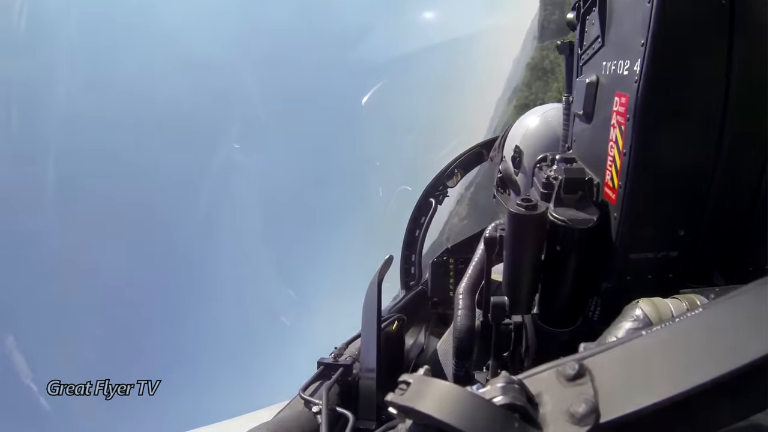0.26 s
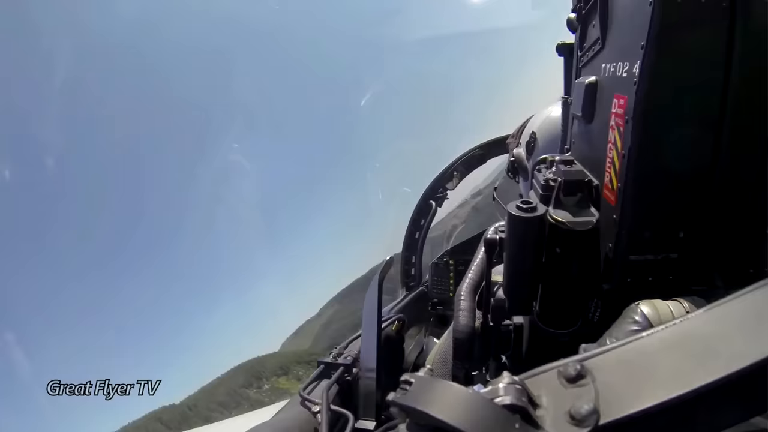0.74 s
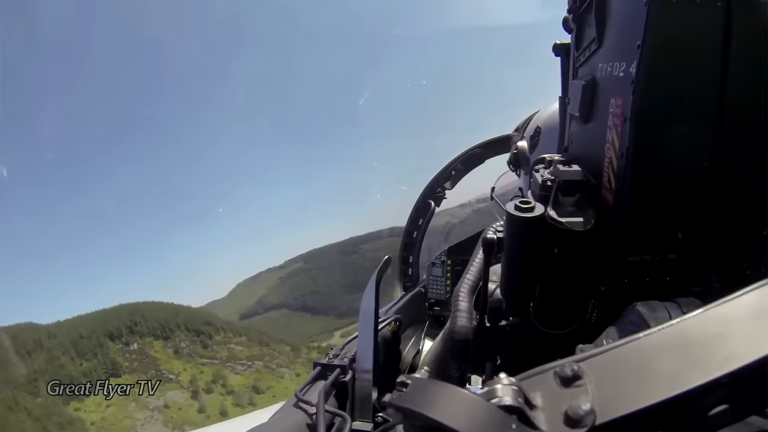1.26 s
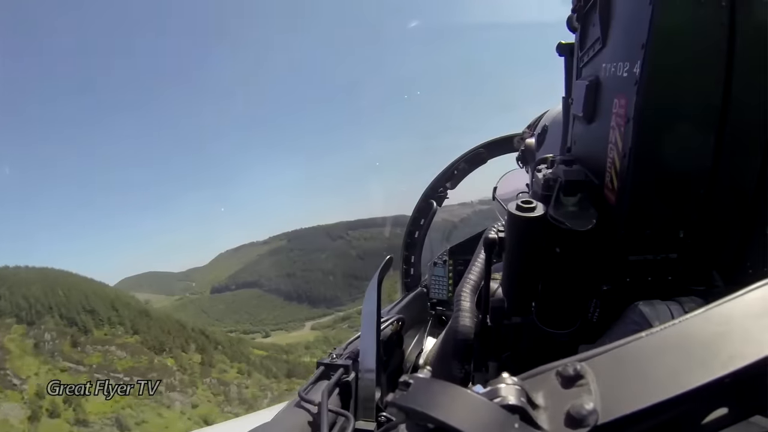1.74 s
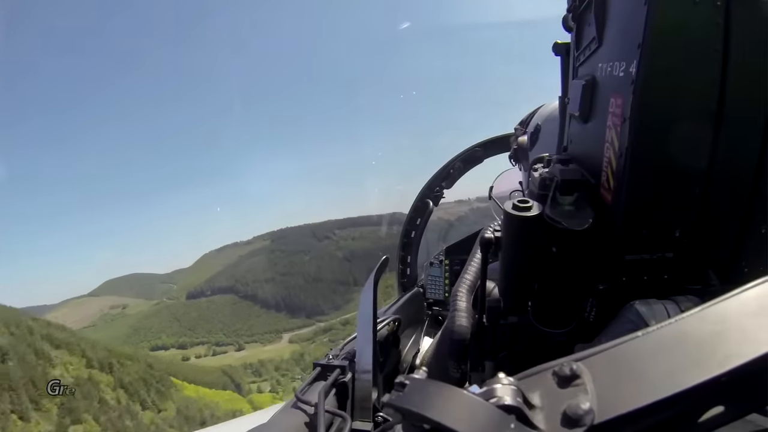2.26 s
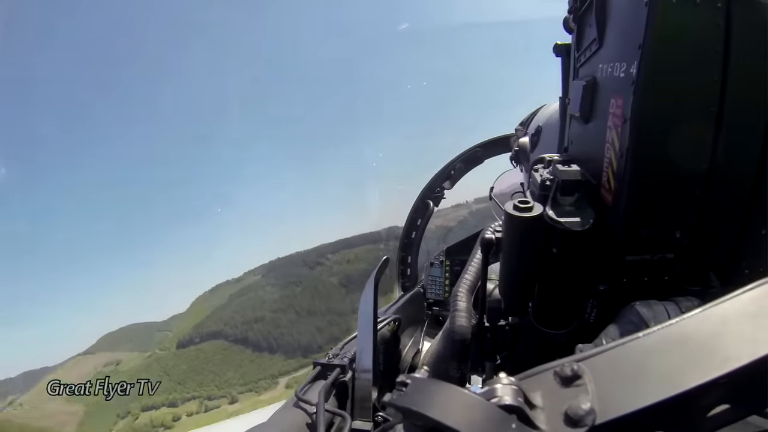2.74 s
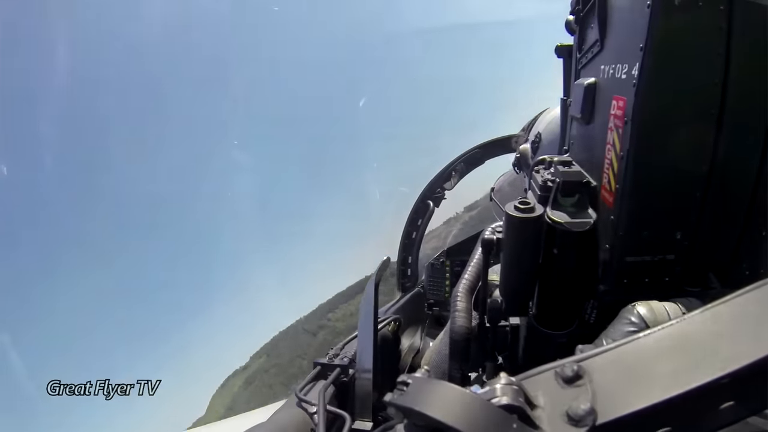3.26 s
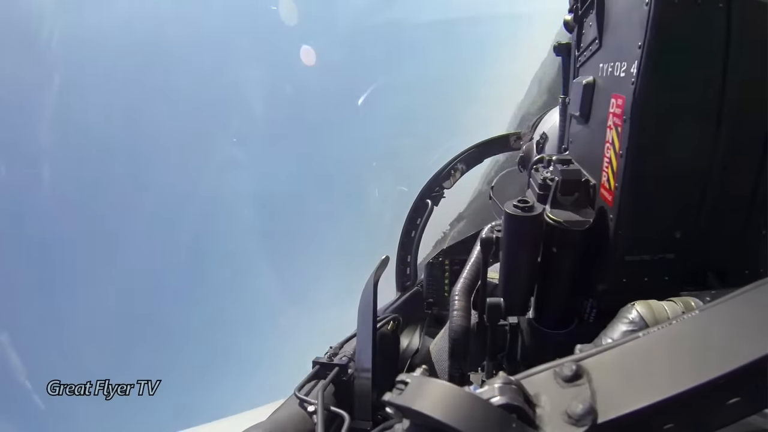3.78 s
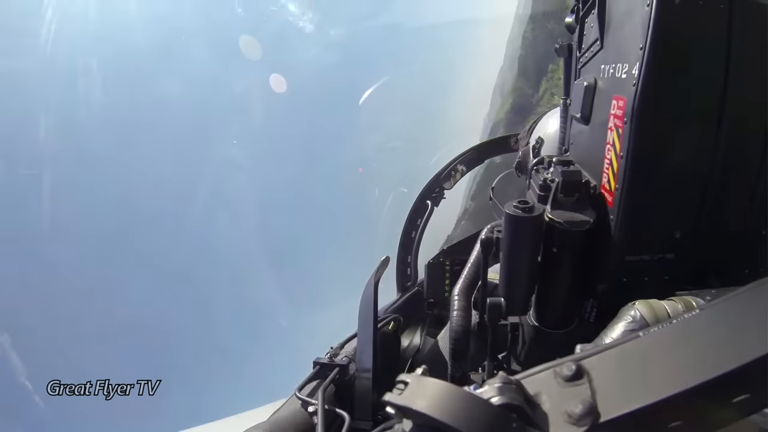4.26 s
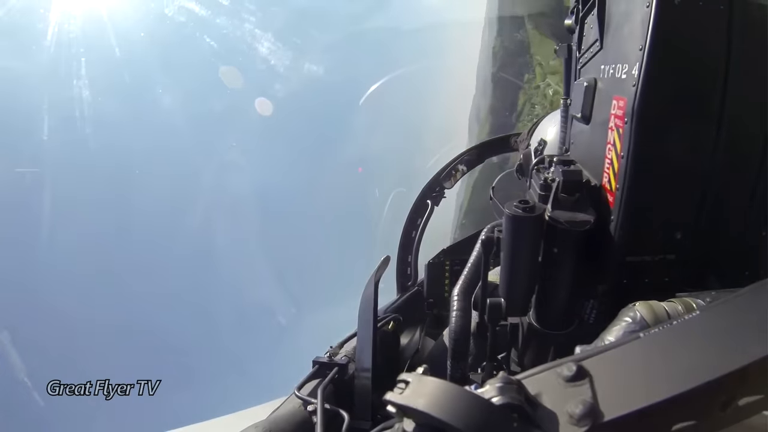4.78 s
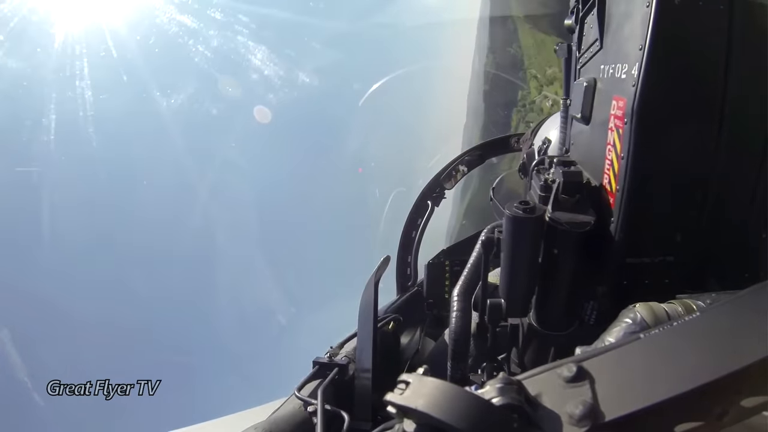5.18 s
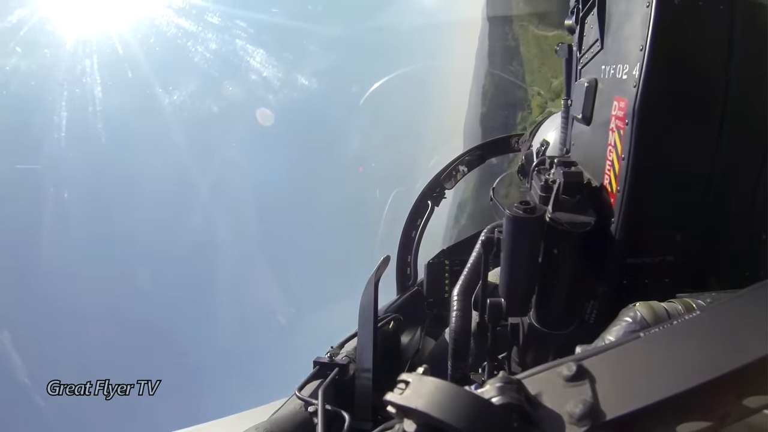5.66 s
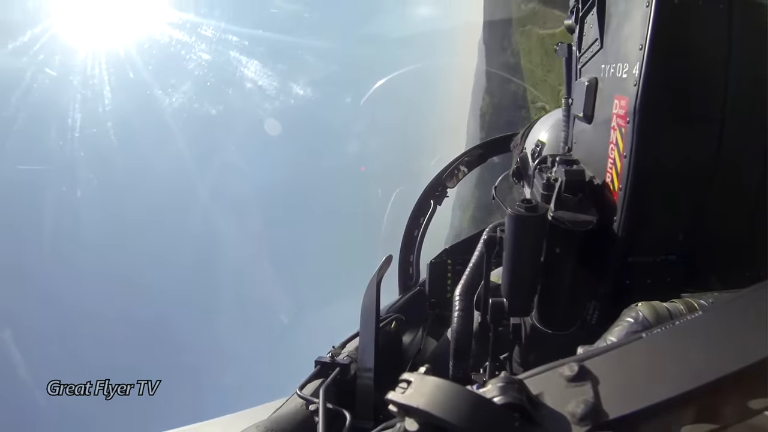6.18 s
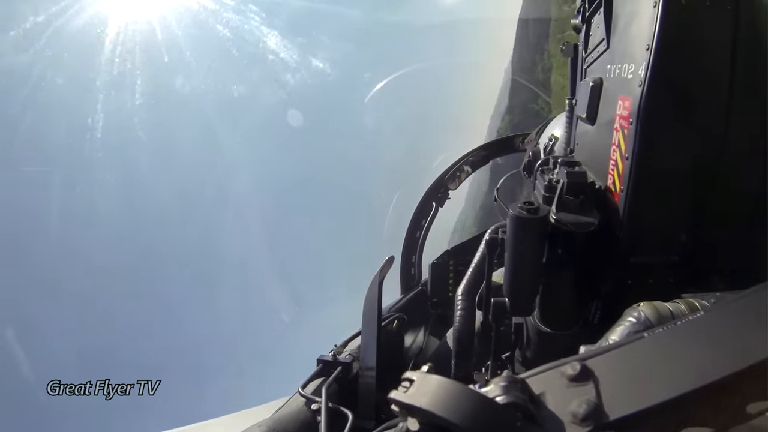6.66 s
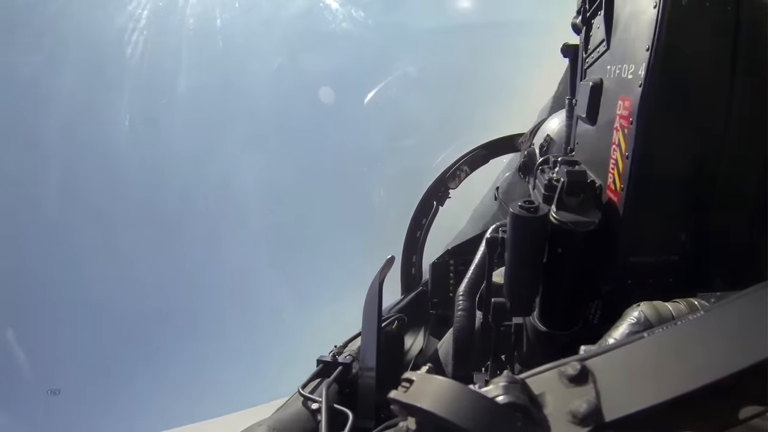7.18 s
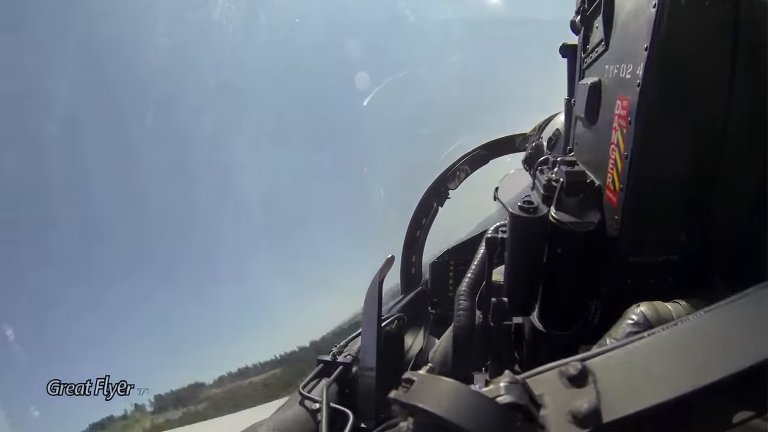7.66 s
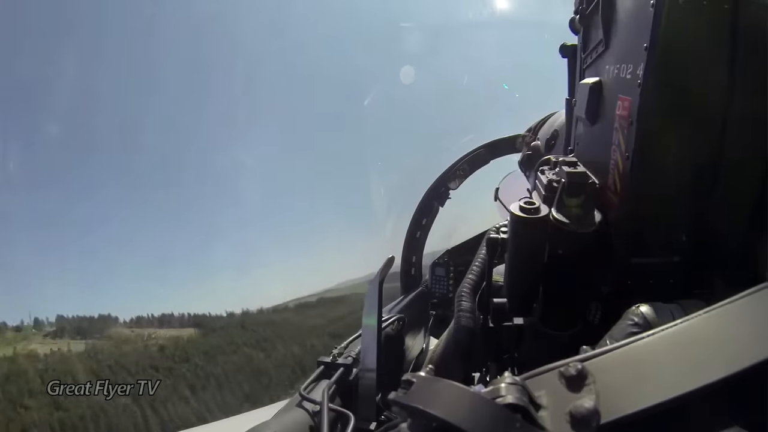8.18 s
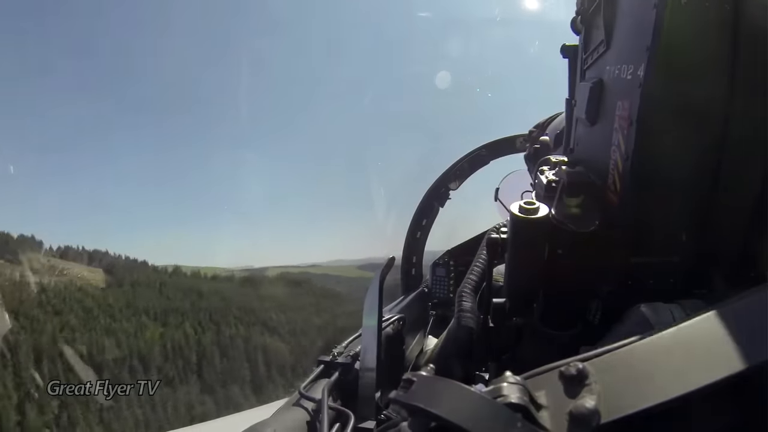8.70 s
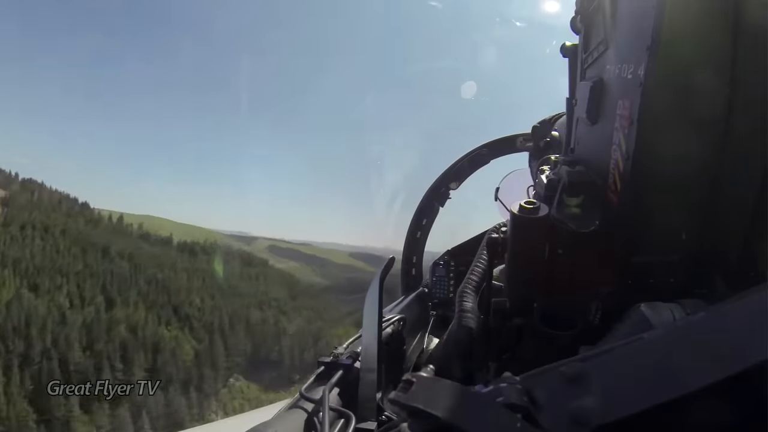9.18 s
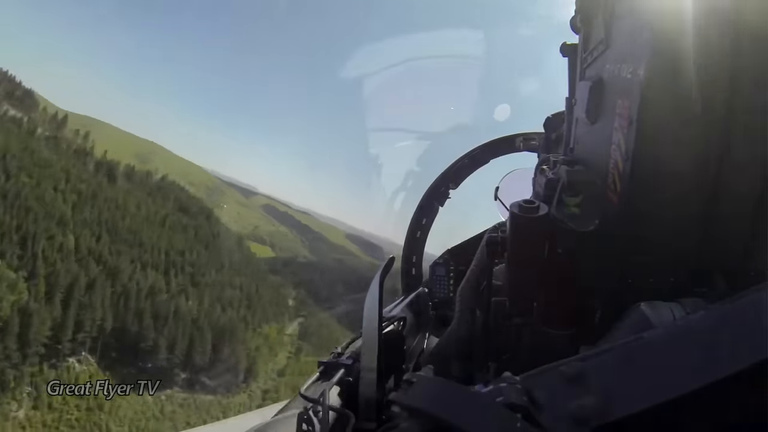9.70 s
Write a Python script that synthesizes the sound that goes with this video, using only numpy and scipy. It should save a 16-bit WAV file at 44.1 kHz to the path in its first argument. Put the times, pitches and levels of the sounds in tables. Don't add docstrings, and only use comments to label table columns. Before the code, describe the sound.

Loud low jet rumble and rushing wind in a closed cockpit, thudding mount knocks at first, then airy whistling that climbs in pitch.

```python
import sys
import numpy as np
from scipy import signal
from scipy.fft import rfft, irfft, next_fast_len
from scipy.io import wavfile
from scipy.ndimage import uniform_filter1d

SR = 44100
rng = np.random.default_rng(int(sys.argv[2]) if len(sys.argv) > 2 else 0)


def transcribe(u):
    v = np.clip(np.atleast_2d(u).T, -1, 1)
    q = np.round(v * 32767).astype(np.int16)
    wavfile.write(sys.argv[1], SR, q)


def invert_db(x):
    u = np.asarray(x, float) / 20
    return 10 ** u


N = 438354


def rms_one(x):
    return x / np.sqrt(np.mean(x ** 2) + 1e-20)


def in_time(rows):
    s, *columns = np.transpose(rows)
    return [np.interp(np.arange(N) / SR, s, c) for c in columns]


def drift(rate_hz):
    sos = signal.butter(2, rate_hz, fs=SR / 40, output="sos")
    slow = signal.sosfilt(sos, rng.standard_normal(N // 40 + 2002))[2000:]
    return np.interp(np.arange(N) / 40, np.arange(len(slow)), rms_one(slow))


def coloured(spectrum, flicker_db=0., even=0., more=()):
    # [centre_hz, width_hz, lift_db]
    resonance_modes = [(36, 61, 8.5), (61.3, 8.5, -6), (83, 24, -0.5), (144.2, 49, 2), (390, 63, 3),
                       (773, 70, -0.5), (1010, 14, -1), (1069.5, 20, 5), (1172, 75, 3.5), (1406, 50, 2.5),
                       (1580, 45, 4.5), (1829, 25, 4),
                       (2290, 300, 6.0), (2610, 120, 7.2), (2920, 90, 4.3), (3860, 120, 4.9),
                     (4320, 130, 4.7), (4980, 110, 5.6), (5130, 120, 4.5), (5690, 650, 9.0),
                     (6930, 1000, 10.9), (9070, 1140, 7.0), (11270, 1280, 12.0), (12690, 80, 5.5),
                     (13060, 250, 8.7), (13470, 560, 9.0)]
    size = next_fast_len(N)
    hz = np.maximum(np.fft.rfftfreq(size, 1 / SR), 1)
    points = np.array(spectrum)
    level_db = np.interp(np.log(hz), np.log(points[:, 0]), points[:, 1], left=-90, right=-90)
    for centre_hz, width_hz, lift_db in [*resonance_modes, *more]:
        level_db += lift_db / (1 + (2 * (hz - centre_hz) / width_hz) ** 2)
    white = rfft(rng.standard_normal(size))
    noise = rms_one(irfft(white * invert_db(level_db), size)[:N])
    swell = np.sqrt(uniform_filter1d(noise ** 2, 4000) + .02)
    evened = noise / swell ** np.clip(even, 0, 1)
    return rms_one(evened * invert_db(flicker_db * drift(35)))


def airframe():
    # [start_s, shudder_db, drone_db]
    airframe_levels = [(0, -11, -23), (.5, -18.5, -19.5), (1.0, -20, -25.5), (1.5, -17.5, -22.5),
                       (1.9, -15, -20.5), (2.3, -22.5, -22), (2.9, -21, -23.5), (3.5, -18.5, -16.5),
                       (4.0, -17, -22.5), (4.5, -16, -19), (5.2, -17, -17.5), (5.9, -16.5, -18),
                       (6.6, -15.5, -17), (7.5, -14.5, -20.5), (8.1, -17, -20), (8.7, -16.5, -20.5),
                       (9.3, -18.5, -16), (9.94, -17, -19)]
    # [pitch_hz, density_db_per_hz]
    shudder_spectrum = [(4.7, -36), (8.0, -33), (32, 1), (43, -3), (59, -9.5), (70, -19), (91, -55),
                        (150, -120)]
    # [pitch_hz, density_db_per_hz]
    drone_spectrum = [(34, -45), (58, -4.5), (65, -3), (124, 2), (142, -2.5), (185, -19.5), (240, -39.5),
                      (410, -120)]
    shudder_db, drone_db = in_time(airframe_levels)
    shudder = invert_db(shudder_db) * coloured(shudder_spectrum, even=0.68)
    drone = invert_db(drone_db) * coloured(drone_spectrum, even=0.15)
    return shudder + drone


def airflow():
    # [start_s, level_db]
    buffet_levels = [(0, 28), (.9, 22.5), (1.6, 23), (2.1, 20.5), (3.4, 21.5), (4.6, 21.5), (6.0, 23.5),
                     (6.8, 22), (7.3, 21.5), (8.2, 18.5), (9.0, 20), (9.94, 20.5)]
    # [pitch_hz, density_db_per_hz]
    buffet_spectrum = [(94, -16), (160, 1.5), (173, -2.5), (226, -7), (290, -12.5), (378, -9), (410, -8),
                       (443, -13), (540, -20), (700, -49.5), (1190, -120)]
    rush_spectrum = [(290, -41), (500, -7), (615, -5.5), (672, -6), (738, 0.5), (897, -5.5), (1050, 1),
                     (1280, -3), (1400, 0), (1510, -5.5), (1830, -7), (1980, -19.5), (2050, -38),
                     (2660, -49), (4510, -120)]
    hiss_spectrum = [(1750, -25.0), (1950, 0.0), (2430, -6.1), (3000, -3.1), (3500, -2.8), (4000, -8.7),
                     (4800, -14.3), (6200, -27.6), (8000, -29.3), (9500, -27.3), (10500, -36.0),
                     (12400, -42.0), (13800, -59.3), (15500, -53.8)]
    # [centre_hz, width_hz, lift_db]
    shifted_modes = [(3930, 160, -3.5), (4240, 160, -2.5), (5760, 260, -2), (7630, 500, 4),
                     (13600, 2200, -6)]
    buffet_db, = in_time(buffet_levels)
    moved = np.arange(N) / SR > 6.22
    hiss_after = invert_db(-.4) * coloured(hiss_spectrum, flicker_db=.5, more=shifted_modes)
    hiss_before = coloured(hiss_spectrum, flicker_db=.5)
    hiss = invert_db(8.5) * np.where(moved, hiss_after, hiss_before)
    rush = invert_db(22) * coloured(rush_spectrum, flicker_db=0.16)
    buffet = invert_db(buffet_db) * coloured(buffet_spectrum, flicker_db=2.5)
    return hiss + rush + buffet


def blades(wobble_hz=3.):
    # [start_s, main_hz, upper_hz, lower_hz]
    blade_pitches = [(0, 8705, 9122, 8392), (.45, 8715, 9116, 8392), (.75, 8770, 9114, 8395),
                     (1.6, 8807, 9117, 8398), (3.2, 8796, 9114, 8397), (3.7, 8769, 9118, 8397),
                     (4.7, 8762, 9114, 8393), (5.3, 8733, 9105, 8387), (6.2, 8720, 9098, 8383),
                     (6.7, 8694, 9090, 8382), (7.8, 8668, 9092, 8381), (9.94, 8658, 9108, 8387)]
    # [start_s, main_db, upper_db, lower_db]
    blade_levels = [(0, -24, -23, -40), (.8, -15, -26, -32), (2.0, -23, -17.5, -32), (3.6, -22, -22, -28),
                    (4.5, -21, -27, -29), (5.2, -20, -36, -38), (6.7, -21, -40, -34), (7.5, -27, -34, -33),
                    (8.2, -22, -26, -31), (9.3, -22, -31, -34), (9.94, -27, -16, -29)]
    out = np.zeros(N)
    for hz, level_db in zip(in_time(blade_pitches), in_time(blade_levels)):
        phase = 2 * np.pi * np.cumsum(hz + wobble_hz * drift(8)) / SR
        out += np.sqrt(2) * invert_db(level_db + 3.2 * drift(4.5)) * np.sin(phase)
    return out


def whistle(rows, flutter_hz=40., steady=0.):
    hz, level_db, wander_hz = in_time(rows)
    t = np.arange(N) / SR
    sounding = (t > rows[0][0]) & (t < rows[-1][0])
    phase = 2 * np.pi * np.cumsum(hz + wander_hz * drift(21)) / SR
    noisy = drift(flutter_hz) * np.sin(phase) + drift(flutter_hz) * np.cos(phase)
    tone = np.sqrt(2) * np.sin(phase)
    return sounding * invert_db(level_db + 1.66 * drift(5.2)) * (steady * tone + (1 - steady) * noisy)


def leaks():
    # [start_s, centre_hz, level_db, wander_hz]
    seal_track = [(5.9, 3270, -20, 25.1), (6.4, 3295, 3.5, 24.9), (7.5, 3240, 3, 24.9),
                  (8.3, 3230, 3.5, 23.8), (9.0, 3242, 1.5, 24.6), (9.94, 3256, 2, 25)]
    high_track = [(5.9, 4950, -29, 6), (6.6, 4960, -15, 6), (8.0, 4965, -13, 6), (9.5, 4970, -13, 6),
                  (9.94, 4970, -18, 6)]
    vent_track = [(4.6, 1823, -14, 10), (5.4, 1837, 5, 10), (6.2, 1810, 3, 10), (6.9, 1812, 8, 10),
                  (7.5, 1795, 10, 10), (8.0, 1790, -4, 10)]
    climb_track = [(8.2, 3190, -14, 5), (8.45, 3235, -2, 5), (8.8, 3255, 0, 5), (9.0, 3280, 4, 5),
                   (9.2, 3340, 7, 5), (9.5, 3432, 5, 5), (9.72, 3452, 4, 5), (9.8, 3480, 3, 5),
                   (9.94, 3490, -1, 5)]
    trail_track = [(9.0, 3170, -12, 4), (9.33, 3260, 4, 4), (9.5, 3310, -2, 4), (9.7, 3330, -10, 4),
                   (9.81, 3362, 8, 4), (9.94, 3390, -4, 4)]
    seal = whistle(seal_track, flutter_hz=150.) + whistle(high_track, flutter_hz=30.2)
    vent = whistle(vent_track, flutter_hz=10.0)
    climb = whistle(climb_track, flutter_hz=12., steady=.75)
    trail = whistle(trail_track, flutter_hz=12., steady=.6)
    return seal + vent + climb + trail


def ring(force, hz, t60):
    r, w = invert_db(-60 / (t60 * SR)), 2 * np.pi * hz / SR
    return signal.lfilter([0, np.sin(w)], [1, -2 * r * np.cos(w), r * r], force)


def push(contact_ms, lean=0.93, length=2048):
    phase = np.minimum(np.arange(length) / (contact_ms * SR / 1000), 1)
    return np.sin(np.pi * phase ** lean) ** 2


def swing(force, rebound_ms):
    return signal.lfilter(*signal.butter(1, 1000 / rebound_ms, "high", fs=SR), force)


def wall(force, damping=0.68):
    # [pitch_hz, level_db, t60_s]
    wall_modes = [(710, -38, 0.0067), (1168, -8.5, 0.037), (1730, -13, 0.018), (2320, -21, 0.03),
                  (2693, -12, 0.01), (3230, -11, 0.0079), (3600, -35, 0.0051), (4960, -20, 0.0052)]
    spread_db = 2.5 * rng.standard_normal(len(wall_modes))
    return sum(invert_db(db + own_db) * ring(force, hz, t60 / damping)
               for (hz, db, t60), own_db in zip(wall_modes, spread_db))


def rattle():
    decay_ms = 1.4
    touches = rng.standard_normal(2048) * (rng.random(2048) < .04)
    dying = touches * np.exp(-np.arange(2048) / (decay_ms * SR / 1000))
    force = np.convolve(dying, push(0.43, length=64))[:2048]
    return invert_db(-12.5) * wall(np.diff(force, prepend=0), damping=1.3)


def add(out, s, sound):
    i = round(s * SR)
    out[i:i + len(sound)] += sound[:N - i]


def bumps():
    # [start_s, peak_db, contact_ms, edge_db]
    bump_events = [(0.0572, -10, 3.7, -27), (0.1056, -4, 3.3, -19), (0.288, -7, 3.2, -16),
                   (0.375, -9.5, 3.5, -20), (0.426, -9, 2.9, -22), (0.473, -8.5, 3, -17.5),
                   (0.518, -10.5, 3.3, -18), (0.552, -8, 3.7, -27), (0.587, -16, 4.9, -25),
                   (0.719, -5.5, 3.5, -20.5), (0.778, -8, 3.1, -20), (0.81, -7.5, 3.3, -25),
                   (0.853, -12, 3.1, -18), (0.909, -9, 2.6, -19), (0.913, -11, 3.2, -24),
                   (1.591, -4, 3.1, -21.5), (1.784, -13, 2.3, -16), (1.859, -14.5, 4.9, -20),
                   (2.303, -11, 3.6, -24), (2.314, -16, 2.6, -18), (2.482, -26, 2.6, -23),
                   (2.571, -15, 4, -20), (3.125, -16, 3.9, -23), (3.468, -17.5, 1.9, -27),
                   (6.354, -13.5, 3.2, -27), (6.429, -19, 2.4, -26), (6.643, -22, 2.8, -16),
                   (7.81, -4.5, 3.3, -18)]
    out = np.zeros(N)
    for s, db, contact_ms, edge_db in bump_events:
        body = swing(push(0.92 * contact_ms, lean=0.73), rebound_ms=4.2)
        edge_force = np.roll(np.diff(push(0.41), prepend=0), round(.0007 * SR))
        edge = invert_db(edge_db) * (wall(edge_force, damping=1.5) + rattle())
        add(out, s + 0.0035, invert_db(db + 7.5) * (body + edge))
    return out


def taps():
    # [start_s, peak_db, contact_ms, ring_db, bounce_db]
    tap_events = [
        (1.104, -18.5, 1.75, -4, 6),
        (1.2969, -8.5, 0.97, -4, -4),
        (1.342, -23.5, 0.9, -12, 8),
        (2.161, -25, 1.7, -14, 2),
        (2.276, -7.5, 1.37, -8, 1.5),
        (2.368, -5, 1.02, -9, -6),
        (2.5966, -3, 0.72, -4.5, -10.5),
        (4.949, -20.5, 1.3, -17, 0),
        (6.212, -5, 0.83, -16, -7),
    ]
    hold_ms, stop_ms = 5.5, 2.5
    out = np.zeros(N)
    for s, db, contact_ms, ring_db, bounce_db in tap_events:
        force = push(contact_ms)
        bounce = invert_db(bounce_db) * np.roll(push(1.78 * contact_ms), round(0.00192 * SR))
        bounce = bounce + invert_db(-8.5) * np.roll(bounce, round(0.00275 * SR))
        thump = invert_db(-8) * np.roll(push(3.7), round(0.00022 * SR))
        rings = invert_db(ring_db) * (wall(np.diff(force, prepend=0)) + invert_db(-16) * rattle())
        ms = np.arange(len(rings)) * 1000 / SR
        rings = rings * np.exp(-np.maximum(ms - hold_ms, 0) / stop_ms)
        crack_db = -25.5 + 58 * (1 - contact_ms)
        crack = invert_db(crack_db) * wall(np.diff(push(0.31), prepend=0), damping=1.5)
        body = swing(force + bounce - thump, rebound_ms=6.5)
        add(out, s + .0034, -invert_db(db + 3.6) * (body + rings + crack))
    return out


def ducking():
    # [start_s, depth_db, recovery_s]
    duck_events = [(.036, 4, 0.18), (.27, 4, 0.073), (.366, 6.5, .09), (.481, 8, 0.39), (.562, 3, 0.1),
                   (.80, -2, 0.064), (.818, 8.5, 0.12), (.92, 4.5, .08), (1.608, 0.5, 0.091),
                   (1.78, 0, 0.19), (2.381, 0.5, 0.17), (2.583, 8.5, 0.95), (3.55, 2.5, 0.45),
                   (4.695, 0.5, .1), (4.97, 2, 0.06), (5.908, 4.5, 0.11), (6.15, 2, .07),
                   (6.233, 5.5, 0.53), (6.301, 2.2, 0.38), (6.53, 2, .07), (6.653, 5.5, 0.15),
                   (6.741, 7, 0.21), (7.295, 1.5, 0.071), (7.73, 3.5, 0.18), (8.82, 3, 0.38),
                   (9.57, 2, 0.57)]
    attack_s = 0.0061
    t, out = np.arange(N) / SR, np.zeros(N)
    for s, depth_db, recovery_s in duck_events:
        out -= depth_db * np.interp(t - s, [0, attack_s, attack_s + recovery_s], [0, 1, 0])
    return out


def scene():
    # [start_s, level_db]
    air_levels = [(0, -53), (.45, -54.5), (.9, -55.5), (1.3, -55), (1.8, -53.5), (2.3, -52), (2.9, -49.5),
                  (3.5, -48.5), (3.75, -48.5), (4.1, -48), (4.55, -49), (5.0, -51.5), (5.5, -50.5),
                  (6.2, -52.5), (7.2, -52), (8.1, -54), (8.6, -51.5), (9.94, -52)]
    air_db, = in_time(air_levels)
    duck_db = ducking()
    air = invert_db(air_db + duck_db) * (airflow() + blades() + leaks())
    frame = invert_db(0.67 * duck_db) * airframe()
    return (frame + air + bumps() + taps())[None]


def band_limit(x):
    return signal.sosfilt(signal.butter(12, 15720, fs=SR, output="sos"), x)


def record(dry):
    x = signal.sosfilt(signal.butter(2, 17., "high", fs=SR, output="sos"), dry)
    top = 1.15
    return band_limit(top * np.tanh(x / top))


dry = scene()
out = record(dry)
transcribe(out)
```